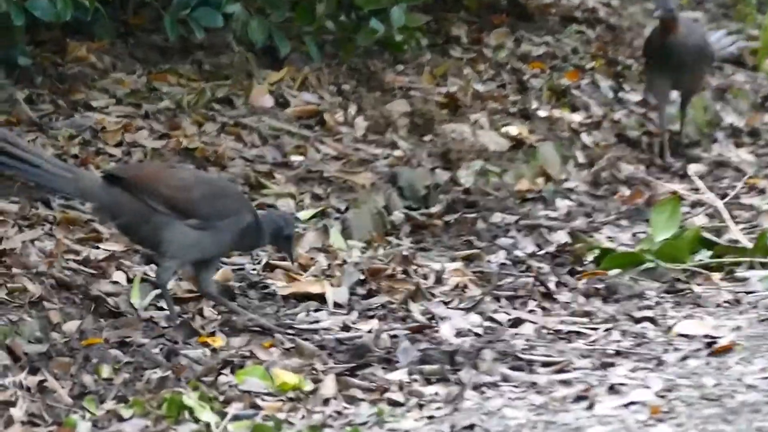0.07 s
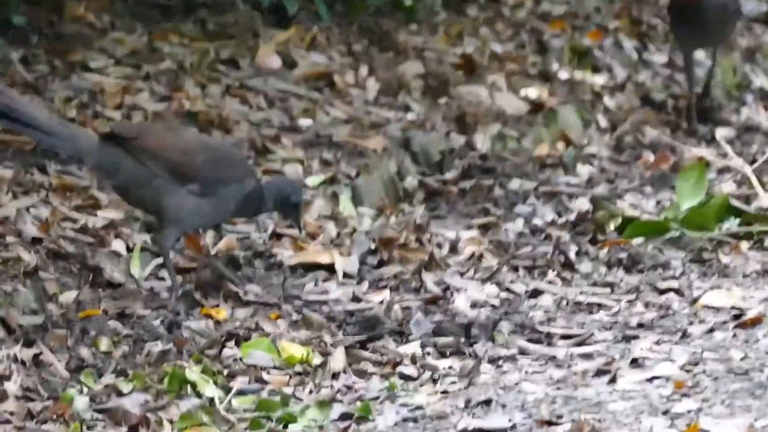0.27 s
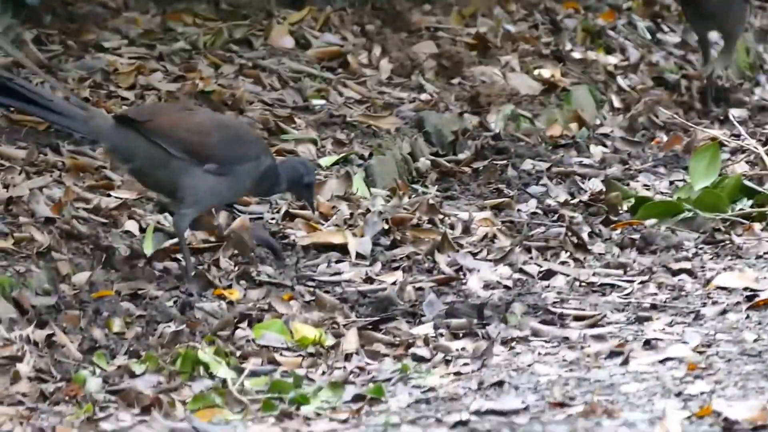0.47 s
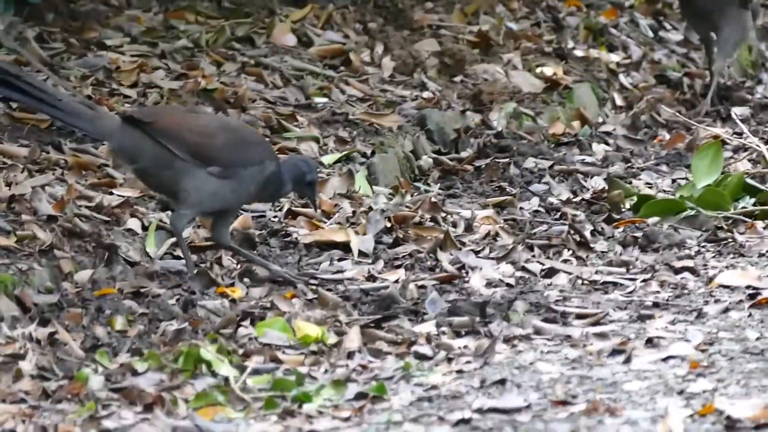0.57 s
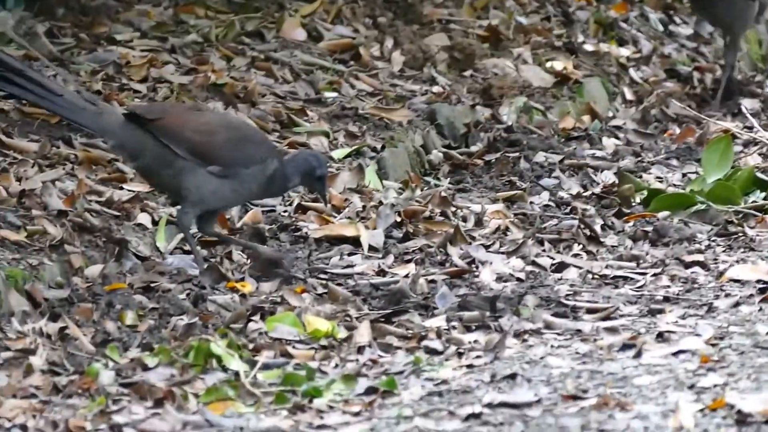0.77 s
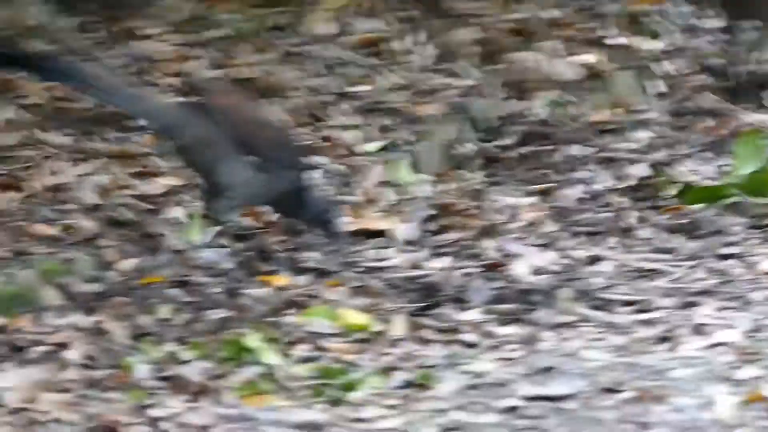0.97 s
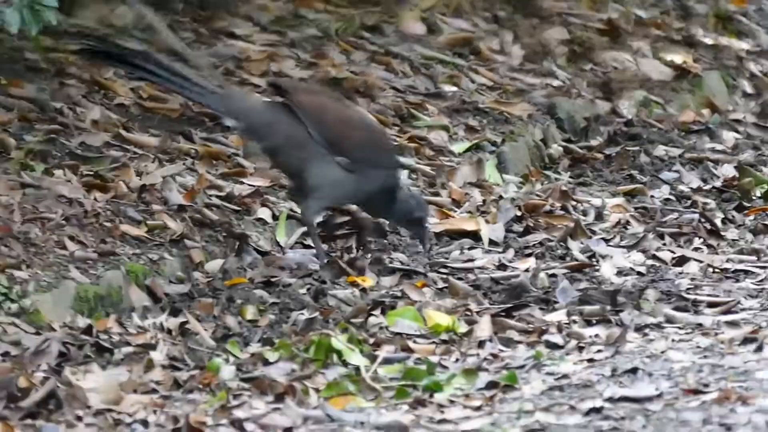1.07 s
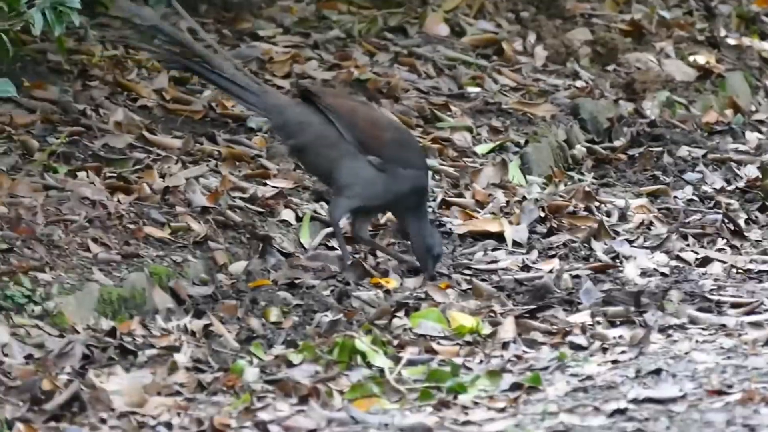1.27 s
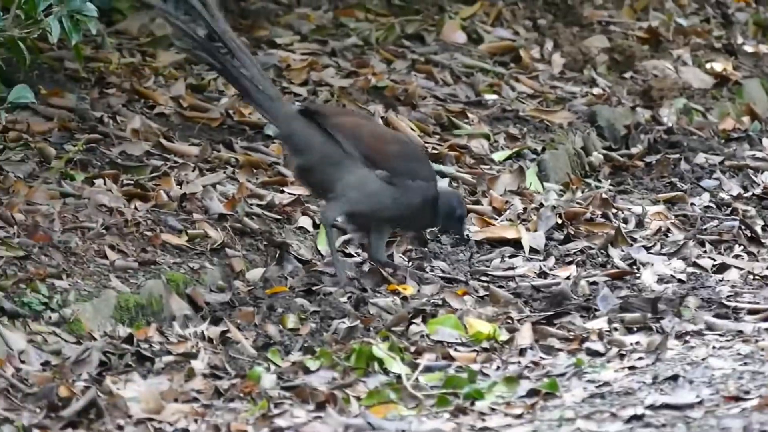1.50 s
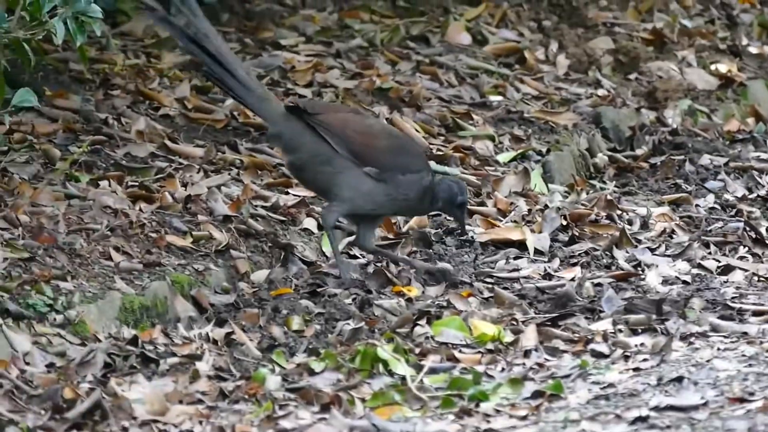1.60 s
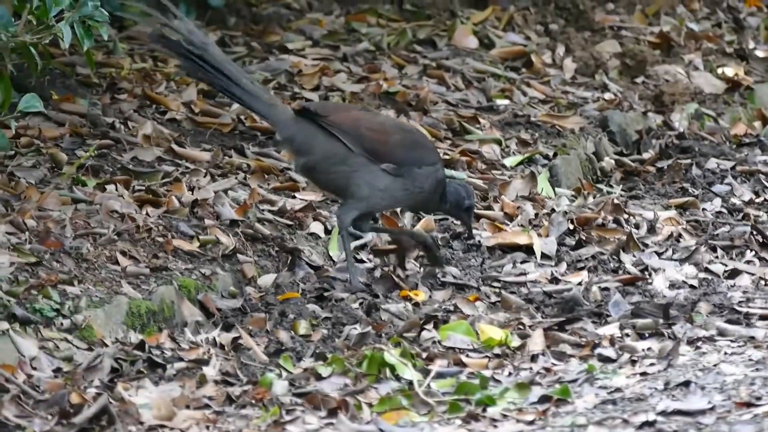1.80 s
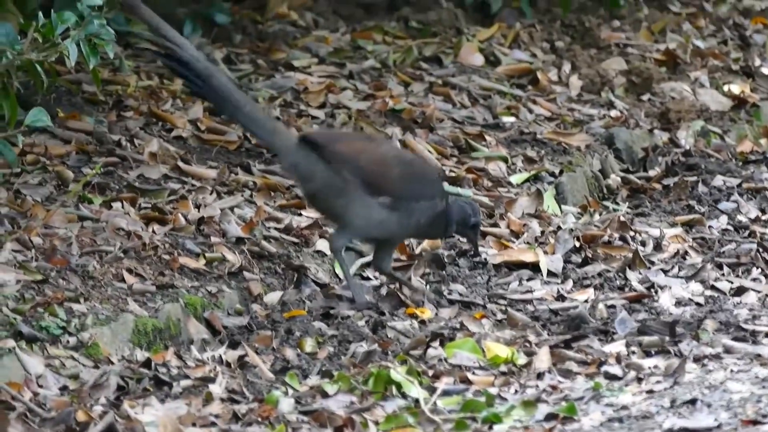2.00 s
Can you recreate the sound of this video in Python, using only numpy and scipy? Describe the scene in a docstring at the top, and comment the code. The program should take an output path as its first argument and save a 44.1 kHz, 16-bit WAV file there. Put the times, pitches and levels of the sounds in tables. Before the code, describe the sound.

Bird call close by: quick two-toned whistle, then raspy squawk, among crackling dry leaves

```python
"""Forest floor by day

Low on the forest floor, a nearby bird gives a two-voiced falling whistle, then a harsh squawk; trunks echo both.
The calls are blurred sines and shaped noise; a far squawk and the echoes of an earlier call are noise alone.
Leaves and twigs snap in noise cracks and dying sines, a foot scuffs the leaves, and faint thin notes glide by.
Under it all lie two layers of noise: a slowly swelling low rumble and a thin steady hiss."""
import sys
import numpy as np
from scipy import signal
from scipy.fft import rfft, irfft, next_fast_len
from scipy.io import wavfile
from scipy.ndimage import uniform_filter1d, map_coordinates

SR = 44100
rng = np.random.default_rng(int(sys.argv[2]) if len(sys.argv) > 2 else 0)


def master_out(mix):
    """Clip the mix to full scale and print it as 16-bit PCM to the path in sys.argv[1]."""
    frames = np.transpose(np.atleast_2d(mix))
    ceiling = np.clip(frames, -1, 1)
    pcm = np.round(ceiling * 32767).astype(np.int16)
    wavfile.write(sys.argv[1], SR, pcm)


N = 90404  # samples


def amp(db):
    """Amplitude factor of a level in dB."""
    return 10 ** (np.asarray(db) / 20)


def unit(x):
    """x scaled to rms 1."""
    return x / np.sqrt(np.mean(x ** 2) + 1e-20)


def along(points, hz):
    """Values at hz, read from (Hz, value) points on a log axis."""
    point_hz, values = np.transpose(points)
    return np.interp(np.log(hz + 1), np.log(point_hz + 1), values)


def curves(rows):
    """One value per sample for each column after the time."""
    seconds, *columns = np.transpose(rows)
    return [np.interp(np.arange(N) / SR, seconds, column) for column in columns]


def wobble(rate_hz):
    """A smooth random curve with rate_hz knots a second."""
    knots = rng.standard_normal(int(N * rate_hz / SR) + 4)
    return map_coordinates(knots, [np.arange(N) * rate_hz / SR])


def filtered(x, response):
    """x with its spectrum multiplied by a function of frequency."""
    size = next_fast_len(N + 8192)
    return irfft(rfft(x, size) * response(np.fft.rfftfreq(size, 1 / SR)), size)[..., :N]


# Side level of the noises by frequency. Each row: frequency in Hz, side against mid in dB.
SIDE_LEVEL = [(30, -10), (150, -24), (1500, -25), (4000, -22), (7000, -10), (9500, 0), (13000, -5)]


def noise(spectrum, patchy_db):
    """Stereo noise of rms 1, its gain random in patches of time and frequency."""
    grains = signal.stft(rng.standard_normal((2, N)), nperseg=512)[2]
    field = rng.standard_normal(grains.shape[1:])
    field = uniform_filter1d(uniform_filter1d(field, 3, 0), 10, 1)
    patchy = signal.istft(grains * amp(patchy_db * unit(field)), nperseg=512)[1][:, :N]
    mid, side = filtered(patchy, lambda hz: amp(along(spectrum, hz) + [0 * hz, along(SIDE_LEVEL, hz)]))
    return unit(np.array([mid + side, mid - side]))


def phase(pitch_hz):
    """Running phase in radians of a moving pitch."""
    return 2 * np.pi * np.cumsum(pitch_hz) / SR


def fade(start_s, end_s, edge_s):
    """A gate from start to end with straight ramps inside it."""
    t = np.arange(N) / SR
    return np.clip(np.minimum(t - start_s, end_s - t) / edge_s, 0, 1)


def blurred(turn, blur, rate_hz):
    """A tone that breaks up: a steady part plus narrow noise around it."""
    in_step = (1 + blur * wobble(rate_hz)) * np.sin(turn)
    across = blur * wobble(rate_hz) * np.cos(turn)
    return (in_step + across) / np.sqrt(1 + 2 * blur ** 2)


# Distant rumble. Each row: time in seconds, level in dB before a small wobble.
RUMBLE_LEVEL = [(0.0, -56.5), (0.3, -50.5), (0.79, -49), (1.24, -49.5), (1.43, -46), (2.05, -48)]
# Its colour. Each row: frequency in Hz, relative density in dB per Hz.
RUMBLE_SPECTRUM = [(35, -83), (60, -49), (140, -45), (179, -21), (215, -11.5), (288, -6.5), (403, -13.5),
                   (458, -1.5), (528, -11), (748, -11), (850, -23.5), (955, -11.5), (1300, -23.5),
                   (1690, -76), (2860, -120)]


def rumble():
    """Distant low noise that swells slowly and wobbles a little."""
    level_db, = curves(RUMBLE_LEVEL)
    return amp(level_db + 1.3 * wobble(8.86)) * noise(RUMBLE_SPECTRUM, patchy_db=2.0)


# Thin hiss of the air. Each row: frequency in Hz, relative density in dB per Hz.
AIR_SPECTRUM = [(700, 2), (1000, -3), (1600, -5), (2200, -5.5), (3200, -2), (4700, -15), (6200, -10),
                (7800, -22.5), (9600, -10.5), (12000, -22.5), (14500, -34), (16000, -54)]


def air():
    """Steady patchy noise at one level."""
    return amp(-49.5) * noise(AIR_SPECTRUM, patchy_db=5.0)


# Echoes of an earlier call. Each row: frequency in Hz, relative density in dB per Hz.
EARLIER_SPECTRUM = [(1500, -14.5), (1650, 3), (2200, -1.5), (2500, -15), (4000, -13.5), (5000, -35)]


def earlier_call():
    """The echoes left by an earlier call: coloured noise dying from the first sample on."""
    start_db, t60_s = -43, .52
    decay = amp(start_db - 60 * np.arange(N) / SR / t60_s)
    return decay * noise(EARLIER_SPECTRUM, patchy_db=2.0)


# A foot scuffing through the leaves. Each row: time in seconds, level in dB of the leaf hiss with its ticks.
CRACKLE_LEVEL = [(0, -64), (.04, -62), (.15, -64.5), (.25, -63.5), (.86, -78), (.92, -54), (.98, -58),
                 (1.05, -66), (1.09, -78), (2.05, -91)]
# Colour of dry leaves, here and in the snaps. Each row: frequency in Hz, relative density in dB per Hz.
LEAF_SPECTRUM = [(1200, -38), (2000, -10), (3200, -1.5), (4400, -3.5), (6000, -5.5), (7500, -13.5),
                 (9500, -1.5), (12000, -10.5), (16000, -31.5)]
# Low body of the scuff. Each row: frequency in Hz, relative density in dB per Hz.
SCUFF_SPECTRUM = [(150, -15), (280, 3), (600, -14), (2000, -12.5), (4000, -23), (6000, -65)]


def crackle():
    """Leaves give way in tiny random ticks over their own hiss, with a lumpy low scuff."""
    ticks_per_s, tick_db, tick_spread_db = 250, 10, 5
    scuff_db = 9  # against the leaf hiss with its ticks
    level_db, = curves(CRACKLE_LEVEL)
    struck = rng.random(N) < ticks_per_s / SR
    ticks = struck * amp(tick_db + tick_spread_db * rng.standard_normal(N))
    tick_decay = amp(-60 * np.arange(200) / SR / .006)  # t60 of 6 ms
    bursts = np.convolve(ticks, tick_decay)[:N]
    leaves = unit(noise(LEAF_SPECTRUM, patchy_db=-14.5) * (1 + bursts))
    scuff = amp(scuff_db + 4.4 * wobble(50.2)) * noise(SCUFF_SPECTRUM, patchy_db=0.0)
    return amp(level_db) * (leaves + scuff)


# Leaf and twig snaps. Each row: start in seconds, bright crack in dB before the leaf colour, woody knock in dB,
# hollowness of the knock in dB, low thud in dB, t60 of the crack in seconds, share of the twig's ring time.
SNAPS = [(0.032, -38, -60, 0, -60, .01, 1), (0.0468, -33.5, -50, -4, -48, 0.014, 1),
         (0.064, -37.5, -52, -4.5, -37.5, 0.011, 1), (0.125, -22, -11.5, -5, -34, .01, 1),
         (0.279, -42, -27.5, 7.5, -35.5, .01, 0.37), (0.917, -42, -50, -3, -52, 0.046, 1),
         (0.9299, -49, -12.5, -10, -28.5, 0.012, 0.52), (0.951, -44, -34, -6, -27.5, .03, 0.56),
         (0.968, -40, -39, 1, -32, 0.013, 1), (.987, -50, -44, -1, -27, .03, 1),
         (1.005, -56, -44, 0, -36, .02, .6), (1.031, -49, -45, -4, -34, 0.028, 1),
         (1.0831, -30, -56, -17, -62, 0.0086, 1)]
# Ringing modes of a twig. Each row: frequency in Hz, level in dB, t60 in seconds before the snap's share.
TWIG_MODES = [(960, 0, .02), (1300, -8, .012), (2120, 0, .014), (2900, -7, .008), (3900, -11, .007)]


def snaps():
    """Each snap is a bright noise crack, a short woody ring of dying sines and a soft thud on the soil."""
    hollow_hz = 1500  # hollowness lifts or lowers the modes below this
    cracks, bodies = np.zeros(N + SR), np.zeros(N + SR)
    t = np.arange(SR // 10) / SR
    for start_s, crack_db, knock_db, hollow_db, thud_db, crack_s, ring_share in SNAPS:
        first = round(start_s * SR)
        at = slice(first, first + len(t))
        crack = amp(crack_db - 60 * t / crack_s) * rng.standard_normal(len(t))
        cracks[at] += crack * (1 - np.exp(-t / .00074))
        ring = 0
        for hz, mode_db, t60_s in TWIG_MODES:
            start_db = mode_db + hollow_db * (hz < hollow_hz) + rng.normal(0, .39)
            ring_s = t60_s * np.clip(ring_share, .1, 2)
            ring = ring + amp(start_db - 60 * t / ring_s) * np.sin(2 * np.pi * hz * t)
        thud_hz = 290 * rng.uniform(.767, 1.19)
        thud = amp(-60 * t / .034) * np.sin(2 * np.pi * thud_hz * t)
        bodies[at] += (amp(knock_db) * ring + amp(thud_db) * thud) * (1 - np.exp(-t / .0017))
    leafy = filtered(cracks[:N], lambda hz: amp(along(LEAF_SPECTRUM, hz)))
    return bodies[:N] + amp(8) * leafy


# Upper voice of the near whistle, stepping down. Each row: time in seconds, pitch in Hz, level in dB.
UPPER_VOICE = [(.165, 3502, -62), (.175, 3565, -41), (.182, 3476, -49), (.185, 3048, -30.5),
               (.194, 3081, -35), (.199, 2754, -29), (.209, 2737, -24.5), (.215, 2517, -29.5),
               (.235, 2532, -21.5), (.244, 2538, -25.5), (.252, 2482, -26), (.28, 2517, -26.5),
               (.3, 2447, -41.5), (.33, 2420, -45.5), (.35, 2520, -65)]
# Lower voice. Each row: time in seconds, pitch in Hz, strength against the upper voice in dB,
# strength of the mixed lines in dB.
LOWER_VOICE = [(.195, 1470, -18, -42), (.215, 1485, -5, -8), (.225, 1490, -8, -5), (.24, 1503, -3.5, -5),
               (.255, 1516, 5.5, 4.5), (.28, 1541, 1.5, -1.5), (.3, 1529, 15.5, -8), (.33, 1495, 17.5, -12),
               (.35, 1460, 30.5, -19)]
# How the two voices mix in the throat. Each row: multiple of the upper, multiple of the lower.
MIXES = [(1, 0), (2, 0), (0, 1), (0, 2), (2, -1), (1, 1), (3, -2)]
# Each value: level of that mix in dB.
MIX_DB = [-1, -19.5, -16.5, -9.5, -9.5, -19, -26]
# Breath in the whistle. Each row: time in seconds, noise level in dB.
WHISTLE_BREATH = [(.17, -62), (.2, -43.5), (.235, -31), (.255, -28), (.285, -30.5), (.31, -40), (.34, -67)]
# Throat colour of the near bird's breath. Each row: frequency in Hz, relative density in dB per Hz.
THROAT_SPECTRUM = [(600, -53), (900, -48), (1280, -15.5), (1600, -18.5), (2100, -9.5), (2550, -1.5),
                   (2950, -5.5), (3200, -7.5), (3650, -6.5), (4100, -16), (4600, -20.5), (5400, -17),
                   (7000, -32.5), (9500, -34), (12000, -65)]


def whistle():
    """Two voices at once, with sum and difference tones as the lower one grows; then the tone turns rough."""
    beak_top_hz = 5900
    upper_hz, level_db = curves(UPPER_VOICE)
    lower_hz, lower_db, mixed_db = curves(LOWER_VOICE)
    upper_turn = phase(upper_hz + 8 * wobble(124.4))
    lower_turn = phase(lower_hz + 8 * wobble(122.5))
    rough = .08 + .36 * fade(.24, 1, .012)
    tone = 0
    for (k, m), mix_db in zip(MIXES, MIX_DB):
        if m == 0:
            strength_db = 0  # the upper voice alone
        else:
            strength_db = mixed_db if k else lower_db
        blur = .12 if (k, m) == (0, 1) else rough
        line = blurred(k * upper_turn + m * lower_turn, blur, 148.4)
        tone = tone + amp(mix_db + strength_db) * line
    tone = filtered(tone, lambda hz: 1 / (1 + (hz / beak_top_hz) ** 12))
    breath_db, = curves(WHISTLE_BREATH)
    breath = amp(breath_db) * noise(THROAT_SPECTRUM, patchy_db=7)[0]
    return (np.sqrt(2) * amp(level_db) * tone + breath) * fade(.16, .35, .0029)


# The near squawk. Each row: time in seconds, pitch in Hz, fundamental in dB, second multiple in dB,
# higher multiples in dB, half-way lines in dB, breath noise in dB, blur from 0 to 1 (capped on use).
SQUAWK = [(.355, 1399, -51, -53, -51, -61, -51.5, .9), (.38, 1330, -43, -55, -52, -46, -47, 1),
          (.4, 1310, -35.5, -51, -43, -43, -41, 0.8), (.42, 1297, -33, -39, -42, -39, -38.5, 0.8),
          (.435, 1204, -32, -50, -28.5, -35, -31, 0.92), (.465, 1191, -31, -30, -25, -32.5, -30, 0.76),
          (.495, 1205, -32, -33, -35, -31, -27.5, 0.72), (.512, 1240, -31.5, -27.5, -40, -42, -25.5, 1),
          (.55, 1280, -31, -21, -35, -32, -24, 0.76), (.575, 1279, -28, -23, -25, -38, -23, 0.51),
          (.6, 1293, -28, -22.5, -27, -45, -21.5, 0.6), (.63, 1270, -28, -21, -40, -36, -25.5, 0.43),
          (.641, 1266, -31, -29, -36, -34, -31, 0.5), (.648, 1273, -46, -29, -30, -50, -32.5, 0.77),
          (.68, 1264, -40.5, -56, -55, -62, -40.5, 0.6)]
# Higher multiples. Each row: multiple of the pitch, relative level in dB.
OVERTONES = [(3, -4), (4, -12.5), (5, -23)]
# Lines half-way between the multiples. Each row: multiple of the pitch, relative level in dB.
HALF_WAY = [(1.5, -21), (2.5, 0.5), (3.5, -7)]


def squawk():
    """A blurred voice with half-way lines; an uneven rattle pulses its breath noise."""
    blur_hz, beak_low_hz = 170, 1020
    rattle_hz, rattle_scatter_hz, rattle_depth = 215, 40, .42
    pitch_hz, base_db, second_db, over_db, half_db, breath_db, blur = curves(SQUAWK)
    share = np.clip(blur, 0, .86)
    blur = share / np.sqrt(2 * (1 - share ** 2))
    turn = phase(pitch_hz + 10 * wobble(150))

    def lines(orders):
        """Blurred sines at multiples of the pitch; higher ones blur wider."""
        total = sum(amp(db) * blurred(k * turn, blur, blur_hz * np.sqrt(k)) for k, db in orders)
        return np.sqrt(2) * total

    rattle_turn = phase(rattle_hz + rattle_scatter_hz * wobble(59.86))
    rattle = unit(np.exp(rattle_depth * np.cos(rattle_turn)))
    # the breath also swells once in each cycle of the voice
    breath = unit(noise(THROAT_SPECTRUM, patchy_db=1.5)[0] * (1 + .8 * np.cos(turn)))
    voice = lines([(1, base_db), (2, second_db)])
    voice = voice + amp(over_db) * lines(OVERTONES) + amp(half_db) * lines(HALF_WAY)
    voice = voice + amp(breath_db) * rattle * breath
    through_beak = filtered(voice, lambda hz: 1 / (1 + (beak_low_hz / (hz + 1)) ** 10))
    return through_beak * fade(.26, .7, .0034)


# Ringing among the trees. Each row: frequency in Hz, t60 in seconds.
TREE_T60 = [(500, 0.74), (2500, 0.76), (8000, 0.94)]


def trees(x):
    """Scattered echoes from trunks: a noise tail in which each frequency dies at its own speed."""
    hz, t, grains = signal.stft(rng.standard_normal(SR), SR, nperseg=256)
    decay = amp(-60 * t / along(TREE_T60, hz)[:, None])
    tail = signal.istft(grains * decay, SR, nperseg=256)[1]
    delayed = np.pad(x, (400, 0))  # samples
    return signal.fftconvolve(delayed, tail / np.linalg.norm(tail))[:N]


# Faint thin notes: one as the near squawk ends, others around the far call's start. Each row: start in seconds,
# length in seconds, first pitch in Hz, last pitch in Hz, level in dB.
NOTES = [(0.637, 0.08, 4370, 4480, -37.5), (0.999, 0.11, 767, 733, -48.5), (1.142, 0.1, 1656, 1680, -56.5),
         (1.13, 0.1, 3235, 3320, -58), (1.187, 0.12, 3990, 3990, -57), (1.203, 0.085, 463, 467, -42.5),
         (1.247, 0.17, 1940, 2050, -50)]


def notes():
    """Short tones, level or gliding, wavering and blurred."""
    edge_s, blur, blur_hz = .022, .6, 110
    t = np.arange(N) / SR
    total = 0
    for start_s, length_s, first_hz, last_hz, level_db in NOTES:
        end_s = start_s + length_s
        pitch_hz = np.interp(t, [start_s, end_s], [first_hz, last_hz])
        tone = blurred(phase(pitch_hz), blur, blur_hz)
        total = total + amp(level_db) * fade(start_s, end_s, edge_s) * tone
    return total


# The far squawk. Each row: time in seconds, level in dB before a 3 dB cut and the opening fade.
FAR_LEVEL = [(1.1, -67), (1.208, -55), (1.226, -61), (1.276, -53), (1.36, -43.5), (1.45, -40), (1.6, -41),
             (1.746, -41.5), (1.98, -49.5), (2.05, -57)]
# Its smeared bands. Each row: multiple of the pitch, relative level in dB.
FAR_ORDERS = [(1, -2), (2, 0), (2.35, -6), (3, 4), (3.8, -9.5), (4.75, -13.5)]
# Colour of its breath. Each row: frequency in Hz, relative density in dB per Hz.
FAR_THROAT = [(760, -42), (1300, -10), (1560, -13), (1930, -6), (2560, -3), (2930, -1.5), (3260, -6),
              (4660, -13), (8000, -31), (10400, -60), (17600, -120)]


def far_squawk():
    """A far call arrives mostly as echoes: noise smeared in bands on the voice's multiples, and breath noise."""
    pitch_hz, smear_hz, breath_db = 956, 29.8, .5  # smear widens with the multiple; breath is against the bands

    def comb(hz):
        """Peaks at multiples of the pitch."""
        return sum(amp(db) / (1 + ((hz - k * pitch_hz) / (k * smear_hz)) ** 2) for k, db in FAR_ORDERS)

    level_db, = curves(FAR_LEVEL)
    bands = unit(filtered(rng.standard_normal(N), comb))
    breath = amp(breath_db) * noise(FAR_THROAT, patchy_db=2.0)
    return amp(level_db - 3.0) * (bands + breath) * fade(1.115, 3, .12)


def scene():
    """The near bird and its echoes among the trees, with the other sounds around it."""
    bird = whistle() + squawk()
    wide_echo = trees(bird) * [[1], [-1]]  # opposite sign left and right
    echo = trees(bird) + amp(-28) * wide_echo
    ground = rumble() + air() + crackle() + snaps()
    others = earlier_call() + notes() + far_squawk()
    return bird + amp(-10.5) * echo + ground + others


def record(dry):
    """The microphone cuts the bass steeply and adds a faint low murmur; nothing is kept above a band limit."""
    low_cut_hz, top_hz = 164.5, 16200
    murmur = amp(-84) * noise([(20, -2), (120, 3), (300, -31)], patchy_db=0)  # (Hz, relative dB per Hz)
    heard = filtered(dry, lambda hz: 1 / (1 + (low_cut_hz / (hz + 1)) ** 6))
    return filtered(murmur + heard, lambda hz: hz < top_hz)


dry = scene()
out = record(dry)
master_out(out)
```